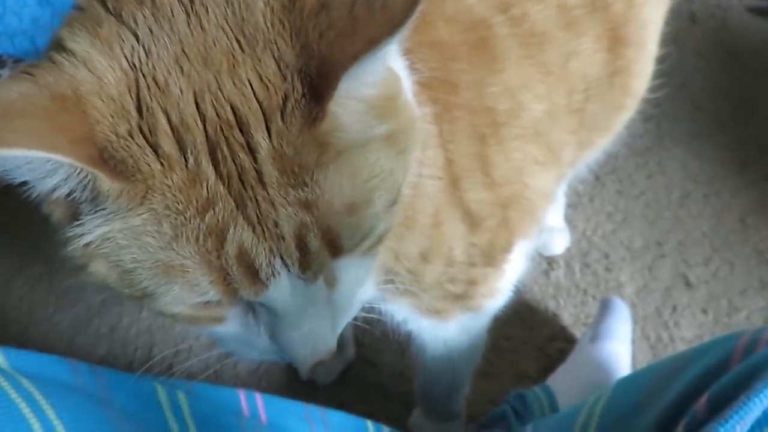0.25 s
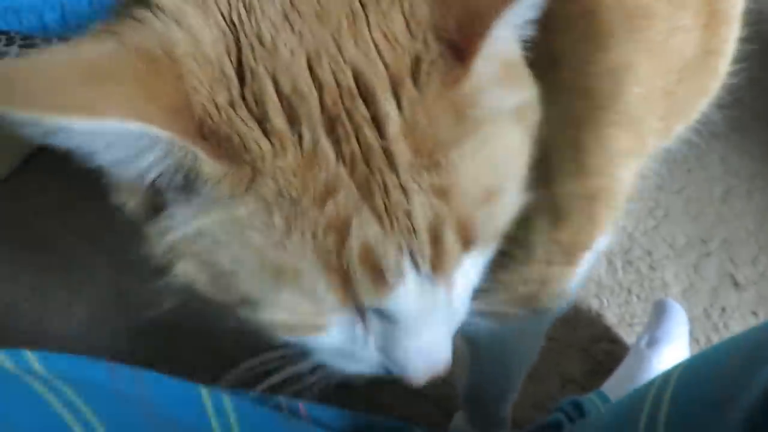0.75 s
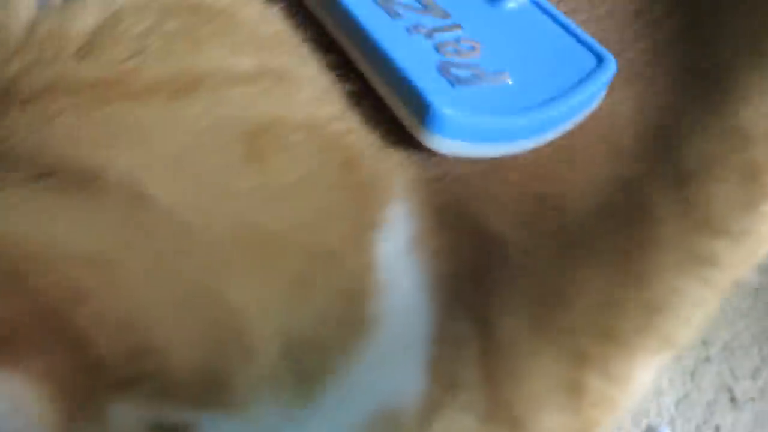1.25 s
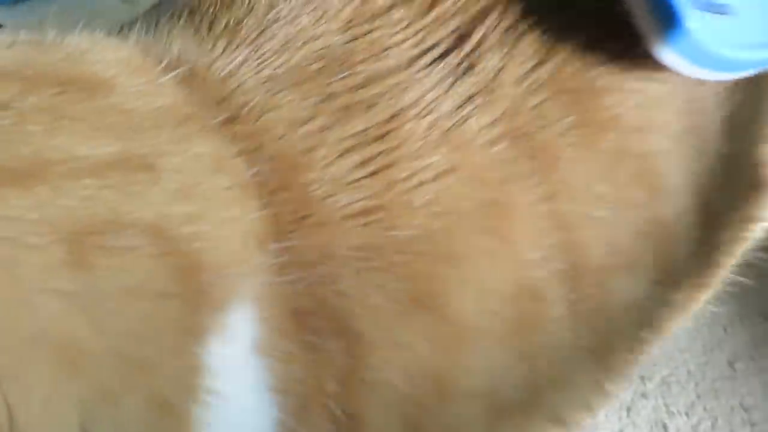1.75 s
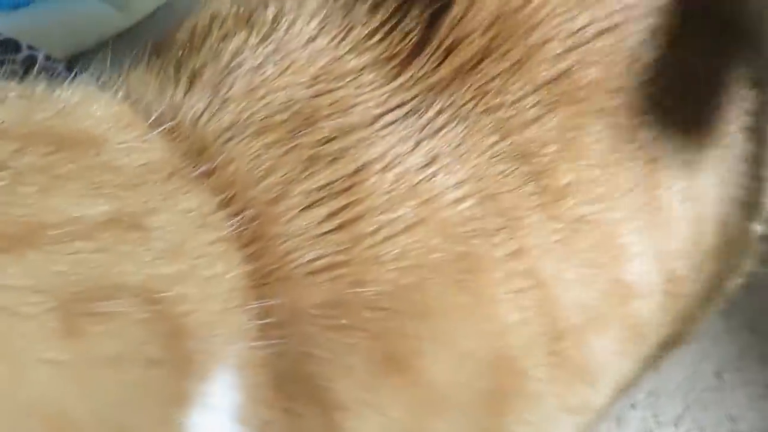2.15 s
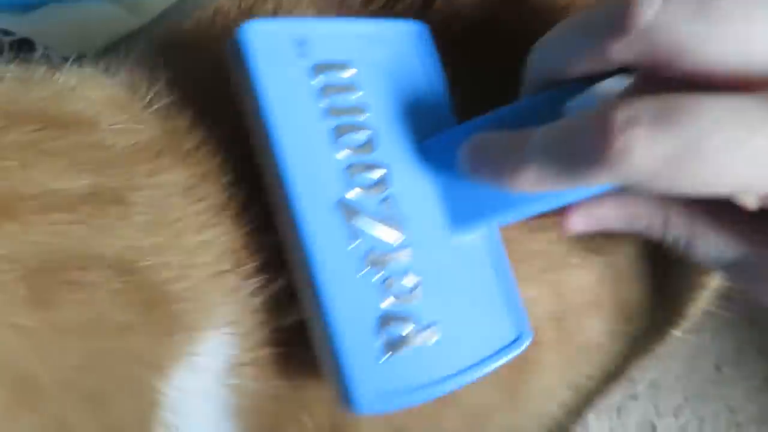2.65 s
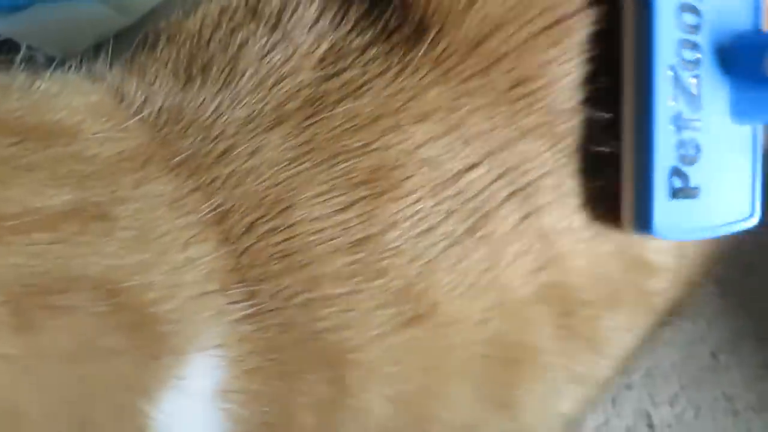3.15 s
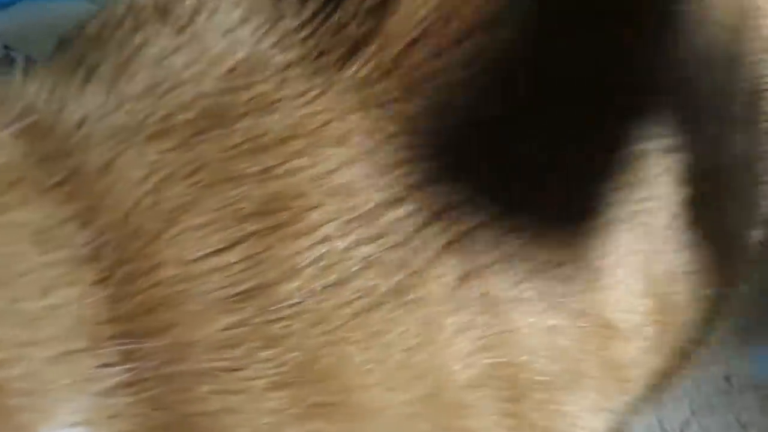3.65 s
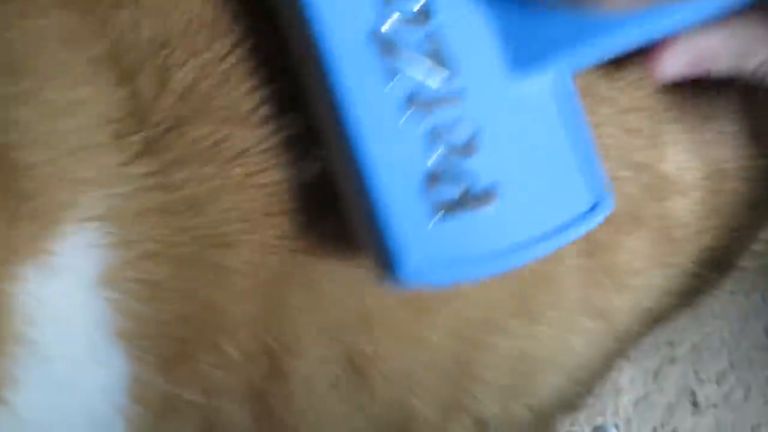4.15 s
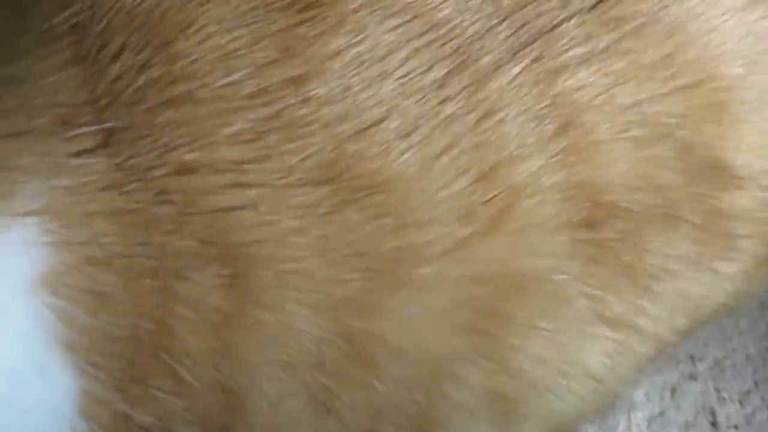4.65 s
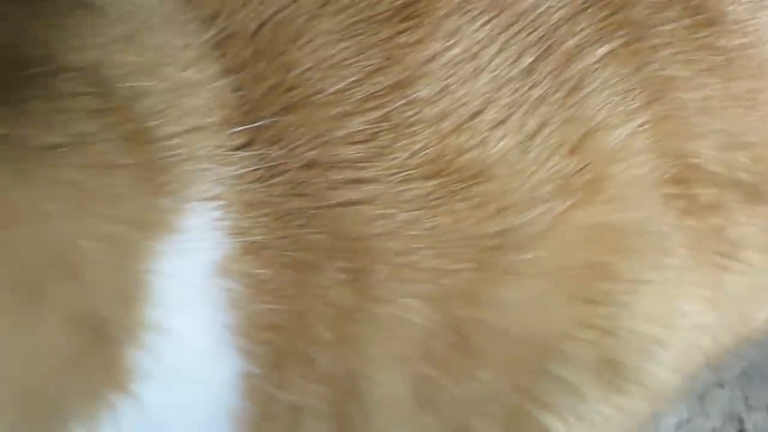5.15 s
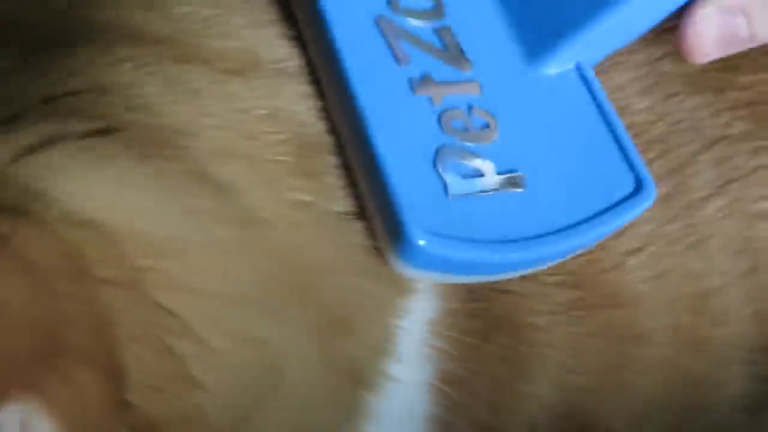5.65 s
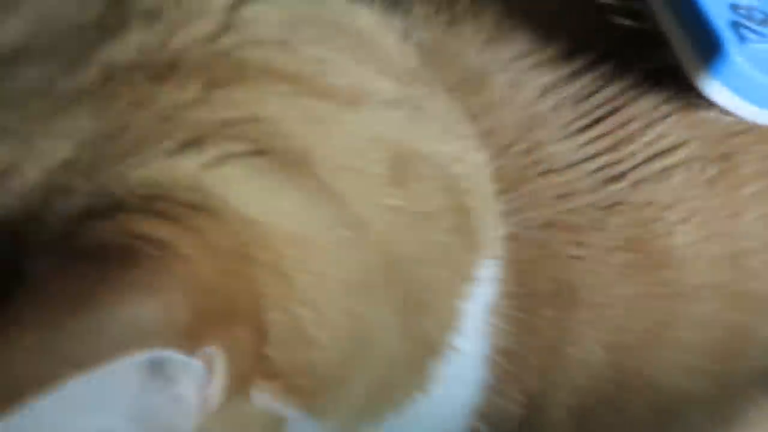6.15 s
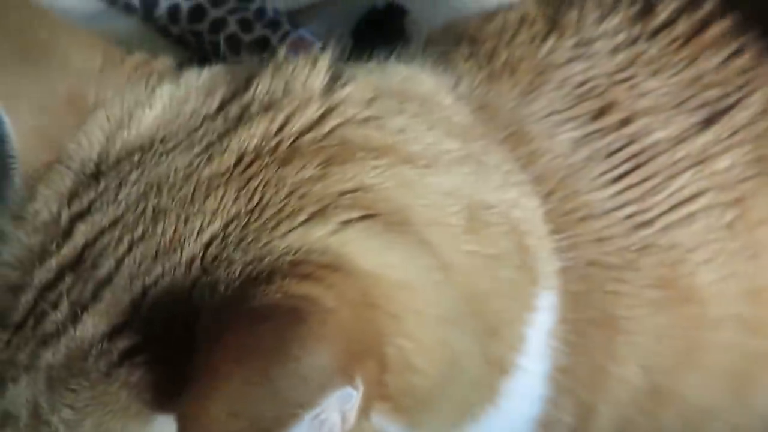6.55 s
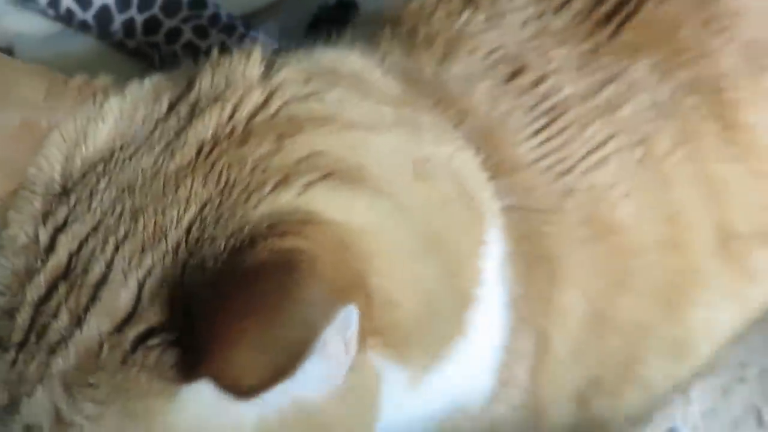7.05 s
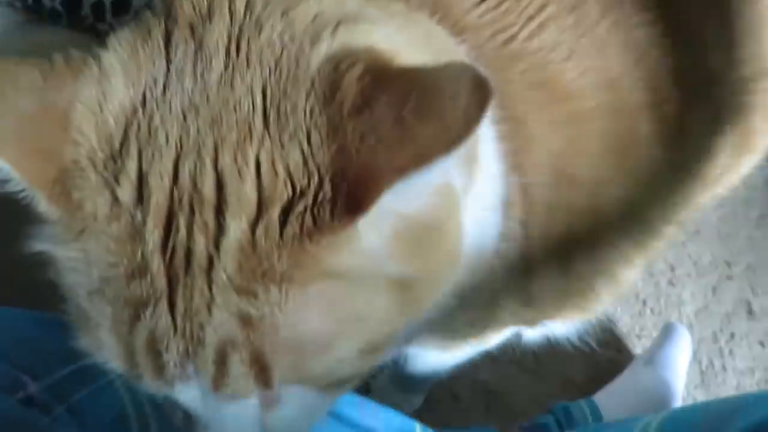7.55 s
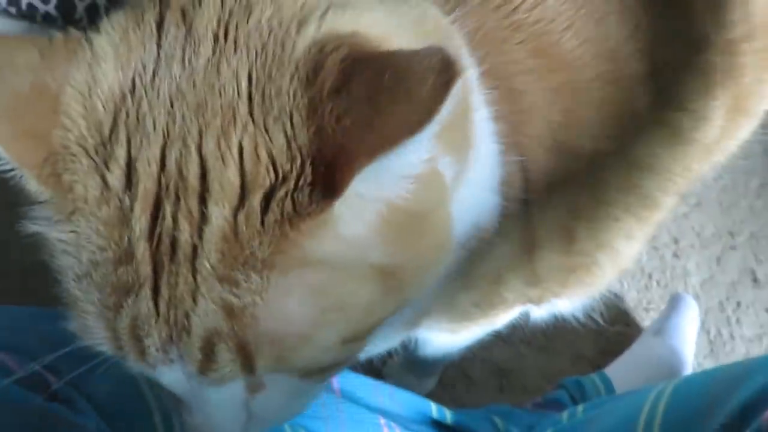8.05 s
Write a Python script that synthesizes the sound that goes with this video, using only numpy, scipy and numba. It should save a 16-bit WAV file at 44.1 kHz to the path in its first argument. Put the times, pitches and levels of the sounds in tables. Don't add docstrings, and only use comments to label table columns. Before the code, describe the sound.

A low, wavering fan hum, soft air and faint stereo hiss run throughout a quiet room. During the first second there is a faint floor shift, light fur rustle and plastic handle snaps at about 0.5 and 0.8 s, the second loudest, then a small knock near 1.2. A swelling, grainy rasp of bristles through fur runs 1.2-2.1 s. A snap at 2.3 and a deep soft thump at 2.65 lead into a firm stroke until 3.4. Clicks and a hollow knock come around 3.8-4.0. The strongest scrape starts at 4.1, peaks near 4.5 and fades by 5.2. After rustles and ticks, a lighter stroke runs 5.9-6.6, followed immediately by a short one until 7.2. Small ticks and rustling fill the gap before a gentle final stroke from 7.9, cut off at 8.3. Very close, dry, with the brush moving slightly away during strokes.

```python
import sys
import numpy as np
from scipy import signal
from scipy.fft import rfft, irfft, next_fast_len
from scipy.io import wavfile
from scipy.ndimage import uniform_filter1d
from numba import njit

SR = 44100
rng = np.random.default_rng(int(sys.argv[2]) if len(sys.argv) > 2 else 0)


def rack_gain(trim_db):
    fader = np.asarray(trim_db, float)
    return 10 ** (fader / 20)


def file_out(sig):
    cols = np.atleast_2d(sig).T
    lim = np.clip(cols, -1, 1)
    pcm = np.round(lim * 32767).astype(np.int16)
    wavfile.write(sys.argv[1], SR, pcm)


N = 365356
TIME = np.arange(N) / SR
FAST = next_fast_len(N)

# time_s, level_db
STROKES = [
    [(1.23, -53.5), (1.472, -38), (1.484, -42), (1.61, -34.5), (1.82, -34.5), (1.844, -31.5), (1.918, -36),
     (2.028, -36.5), (2.12, -55.5)],
    [(2.66, -43), (2.668, -53.5), (2.77, -38), (2.916, -39.5), (3.094, -33), (3.232, -36.5), (3.404, -40),
     (3.438, -57), (3.45, -49)],
    [(4.09, -61), (4.098, -49.5), (4.234, -34.5), (4.314, -39.5), (4.484, -29), (4.646, -32), (4.89, -38),
     (5.19, -51.5), (5.2, -62)],
    [(5.86, -50.5), (6.016, -39.5), (6.028, -45), (6.05, -39), (6.056, -39.5), (6.164, -43.5), (6.272, -42),
     (6.46, -34.5), (6.6, -44.5)],
    [(6.66, -46.5), (6.74, -38.5), (6.828, -39), (6.86, -36.5), (7.11, -44.5), (7.182, -52), (7.2, -59)],
    [(7.93, -50), (7.948, -52), (7.99, -53), (8.014, -47), (8.206, -40.5), (8.28, -41)],
]
# time_s, tilt_db (shell share), facing_db (tips toward camera)
TILTS = [
    [(1.3, -5.5, 1.5), (1.4, -8, 1), (1.63, -9.5, 0), (1.86, -4, 0.5), (2.04, -9.5, 2.5), (2.08, -5.5, 4)],
    [(2.72, -7.5, -6), (2.77, -10, 2), (2.9, -7.5, -4), (3.1, -7, -2.5), (3.22, -5.5, 1), (3.34, -7.5, 1.5),
     (3.42, -7, -2)],
    [(4.12, -9.5, -2), (4.21, -8, 6.5), (4.27, -8.5, 0.5), (4.47, -6, -2), (4.65, -2.5, 2),
     (4.73, -3.5, -7), (4.86, -6, 2.5), (5.15, -7.5, 2)],
    [(5.9, -9.5, -3), (6.0, -7, -2), (6.17, -10.5, 1), (6.31, -8.5, 0), (6.42, -8, 1), (6.5, -7.5, -0.5),
     (6.58, -7, -1)],
    [(6.68, -8.5, 1), (6.76, -4.5, 0), (6.88, -6, 1), (6.96, -1.5, 4), (7.1, -6.5, 3.5), (7.16, -4, 4)],
    [(7.95, -6.5, 0), (8.02, -7, -0.5), (8.14, -7, 3.5), (8.2, -7.5, -2.5), (8.28, -9, 2)],
]
# start_s, arrive_s, return_s
SWEEPS = [
    (1.302, 2.123, 2),
    (2.7, 3.55, 3.8),
    (4.2, 4.85, 5.4),
    (5.894, 6.6, 7),
    (7.9, 8.8, 8.9),
]
# freq_hz, gain_db
FUR_SPECTRUM = [(700, -18), (1300, -10), (2900, 0), (3500, -1.5), (5500, -7.5), (7000, -7), (9000, -30)]
# freq_hz, gain_db
TIP_SPECTRUM = [(3500, -20), (5800, 10), (7000, 10.5), (8500, 12), (11000, 15.5), (13000, 15.5),
                (14500, 9.5), (16000, 9)]
# freq_hz, gain_db
TIP_TOP_SPECTRUM = [(11500, -30), (14500, -12)]
# freq_hz, gain_db
SIDE_GAIN = [(500, -24), (2200, -6), (5000, 0), (9000, 3), (13000, 3), (16000, 9)]
# start_s, peak_db, low_ring_hz, shell_db, treble_db
SNAPS = [
    (.4645, -26.5, 2140, -12, -8),
    (.7883, -16.5, 2500, 3.5, -3.5),
    (.9594, -31, 3470, 2, -3.5),
    (2.3340, -24.5, 2600, 3, -2.5),
    (3.8072, -28.5, 1780, -5, 11),
    (4.0070, -32.5, 1920, -10, -20),
    (5.4505, -30.5, 2620, -1, -4),
    (5.8208, -28.5, 1900, -3, 2.5),
]
# start_s, peak_db, low_ring_hz
BOUNCES = [(0.47, -32.5, 3260), (.4750, -32, 1500), (.4810, -38, 2600), (0.791, -33, 2980),
           (2.3423, -39, 2600), (2.3470, -35, 2500), (2.3506, -31.5, 2550), (2.3566, -39, 2600),
           (3.8119, -50, 1700)]
# start_s, peak_db, low_ring_hz
TICKS = [(0.4995, -40, 1610), (0.6995, -40, 1920), (0.9035, -39, 2060), (0.989, -36.5, 1630),
         (1.044, -41, 1640), (1.466, -37, 2050), (2.3793, -39, 2340), (2.4093, -44, 1640),
         (2.4502, -46, 1740), (2.6525, -49, 1950), (2.758, -28, 2200), (2.772, -26, 1940),
         (3.5674, -45, 2410), (4.019, -47, 1910), (5.2744, -36, 2270), (5.474, -42, 2200),
         (5.565, -37, 1530), (5.672, -39, 1620), (5.702, -41, 1870), (7.2798, -43, 2070),
         (7.414, -38, 2090), (7.614, -38.5, 1840), (7.706, -36.5, 3000), (7.773, -35, 1690),
         (7.812, -40, 1960), (7.9035, -32, 1720)]
# time_s, level_db
RUSTLES = [
    [(0.4, -65), (0.932, -51), (1.25, -64)],
    [(2.1, -55), (2.356, -61), (2.62, -56.5)],
    [(3.45, -51), (3.752, -72), (4.016, -52.5), (4.1, -63)],
    [(5.2, -66), (5.368, -61), (5.636, -61), (5.85, -48)],
    [(7.2, -52), (7.342, -59), (7.678, -57), (7.9, -48.5)],
]
# start_s, peak_db, pitch_hz, t60_s
KNOCKS = [
    (1.164, -27.5, 315, 0.0072),
    (1.1650, -38, 735, 0.012),
    (3.95, -30, 343, 0.068),
]
# start_s, peak_db, settled_hz, hold_s, t60_s
THUMPS = [
    (2.116, -33, 35.6, 0.11, .5),
    (2.139, -37, 65, 0.13, 0.41),
    (2.653, -22, 50.4, 0.018, 0.16),
    (2.672, -27, 36, 0.13, 0.52),
    (3.162, -33, 39, 0.054, 0.46),
    (5.131, -34.5, 76.6, 0.069, 0.53),
    (0.038, -38, 86, 0.092, 0.41),
    (.72, -43.5, 69, 0.55, .6),
]
# centre_s, peak_db, length_s
HUM_SWELLS = [(.3, -42.5, 0.37), (.56, -38.5, 0.088), (1.012, -43.5, 0.57), (1.506, -42.5, 0.4),
              (1.91, -43, 0.41), (2.345, -45.5, 0.33), (2.953, -45, 0.52), (3.473, -43.5, 0.22),
              (3.75, -43.5, 0.1), (4.258, -43.5, 0.55), (4.86, -43, 0.35), (5.356, -45, 0.31),
              (5.666, -43.5, 0.44), (6.03, -42, 0.23), (6.337, -41.5, 0.19), (6.707, -43, 0.19),
              (6.95, -45.5, 0.2), (7.165, -40.5, 0.2), (7.493, -44, 0.24), (7.903, -47.5, 0.63)]
# time_s, level_db
DRONE_LEVEL = [(0, -44), (.6, -64.5), (.8, -45.5), (1.6, -45), (2.0, -54), (3.3, -49), (3.55, -47),
               (5.2, -46), (5.8, -45.5), (6.6, -46.5), (6.8, -55), (8.28, -61)]
# freq_hz, level_db, width_hz
MOTOR_BANDS = [(241.4, -52, 33), (349.9, -56.5, 26)]
# freq_hz, density_db_per_hz
ROOM_SPECTRUM = [(12, -52), (25, -13), (90, -4.5), (120, -5), (150, -8.5), (219, -12.5), (390, -14.5),
                 (500, -22.5), (881, -23.5), (1600, -29), (8400, -45.5), (11000, -51), (13500, -54.5),
                 (15500, -84)]
# freq_hz, density_db_per_hz
HISS_SPECTRUM = [(12, -62), (20, -35), (107, -13.5), (145, -6.5), (226, -3), (442, -2.5), (635, -7),
                 (1390, -10.5), (2290, -12), (6250, -21.5), (11200, -31), (15700, -34)]
LINES_HZ = (480, 603, 865.5)
LINES_DB = (-65, -68, -64)

SHELL_HZ = 4344
FLAT_TILT_DB = -6.5


def level(x, rms_db):
    return x * rack_gain(rms_db) / np.sqrt(np.mean(x ** 2))


def colour(x, points):
    points_hz, points_db = np.transpose(points)
    bin_hz = np.arange(FAST // 2 + 1) * SR / FAST + 1
    gain = rack_gain(np.interp(np.log(bin_hz), np.log(points_hz), points_db))
    return irfft(rfft(x, FAST) * gain, FAST)[:N]


@njit
def svf(x, hz, width_hz):
    y, band, low = np.empty(len(x)), 0., 0.
    for i in range(len(x)):
        g, k = np.tan(np.pi * hz[i] / SR), width_hz / hz[i]
        v = (band + g * (x[i] - low)) / (1 + g * (g + k))
        band, low, y[i] = 2 * v - band, low + 2 * g * v, k * v
    return y


def ring(x, hz, width_hz):
    hz = np.clip(hz + np.zeros(len(x)), 20, SR / 3)
    once = svf(x, hz, 1. * width_hz)
    return svf(once, hz, 1. * width_hz)


def walk(rate_hz):
    hold = int(SR / rate_hz)
    steps = np.repeat(rng.standard_normal(N // hold + 1), hold)
    return uniform_filter1d(uniform_filter1d(steps, hold), hold)[:N]


def play(tables, fade_s):
    rows = []
    for table in tables:
        first, last = table[0], table[-1]
        if rows and first[0] - rows[-1][0] < fade_s:
            rows.pop()
        else:
            rows.append([first[0] - fade_s, -95, *first[2:]])
        rows += [*table, [last[0] + fade_s, -95, *last[2:]]]
    time_s, *columns = np.transpose(rows)
    return [np.interp(TIME, time_s, column) for column in columns]


def brush(tangles_db):
    pressure_db, = play(STROKES, fade_s=0.078)
    time_s, tilt_db, facing_db = np.concatenate(TILTS).T
    tilt_db = np.interp(TIME, time_s, tilt_db) - FLAT_TILT_DB
    facing = rack_gain(np.interp(TIME, time_s, facing_db))
    pad_hz = (1802 + 6 * tilt_db) * (1 + 0.05 * walk(14))
    rim_hz = 2460 * (1 + 0.05 * tilt_db + 0.04 * walk(12))
    shell_hz = SHELL_HZ * (1 + 0.04 * walk(9))
    # flat_db, slope (dB per dB of tilt), far_db (change once moved off), sound
    layers = [(-3.5, -0.64, -2.3, ring(slips(), pad_hz, 750)),
              (-11, 0.19, 3.6, ring(slips(), rim_hz, 820)),
              (-12, -0.4, 2.2, ring(slips(), 1158, 720)),
              (-6, 1.75, -0.32, ring(slips(), shell_hz, 1520)),
              (-10.5, -0.15, 2.8, colour(slips(), FUR_SPECTRUM)),
              (-11, 0.02, 0.3, tips(facing))]
    total = np.zeros(N)
    for flat_db, slope, far_db, sound in layers:
        motion_db = uniform_filter1d(pressure_db + slope * tilt_db + far_db * travel(), size=1500)
        total += level(sound, flat_db) * rack_gain(motion_db + tangles_db + 1.3 * walk(40))
    return echo(total)


def slips(rate_hz=5000, spread_db=3):
    chance = rng.random((3, N))
    size = rack_gain(np.minimum(-spread_db * np.log(chance[0] + 1e-9), 13))
    return (chance[1] < rate_hz / SR) * size * np.sign(chance[2] - .5)


def tips(facing):
    hiss = colour(slips(), TIP_SPECTRUM)
    top_db = -9 * travel()
    return facing * (hiss + (rack_gain(top_db) - 1) * colour(hiss, TIP_TOP_SPECTRUM))


def travel():
    along = np.linspace(0, 1, num=6)
    time_s, distance = [.75], [1]
    for start_s, arrive_s, return_s in SWEEPS:
        time_s += [*(start_s + along * (arrive_s - start_s)), return_s]
        distance += [*along ** 2, 1]
    return np.interp(TIME, time_s, distance)


def echo(x):
    delay = np.round(2.8 * (1 + .25 * walk(3)) * SR / 1000).astype(int)
    late = np.arange(N) - delay
    return x + 0.45 * x[np.clip(late, 0, N - 1)]


def ticks():
    out, t = np.zeros(N), np.arange(2048) / SR
    rows = [*SNAPS]
    rows += [(*bounce, -3, -9) for bounce in BOUNCES]
    rows += [(s, db - 1.5, hz, -3, -9) for s, db, hz in TICKS]
    noise = rng.standard_normal((len(rows), 4, len(t)))
    for (start_s, peak_db, low_hz, shell_db, treble_db), x in zip(rows, noise):
        rise_ms = 1.45 * rack_gain(-0.6 * max(treble_db + 7, 0))
        u = t * 1000 / rise_ms
        burst = u * np.exp(-u ** 2 / 2)
        rattle = 0.07 * np.minimum(u, 1) * np.exp(-t / 0.012)
        low, shell, edge, crack = x * (burst + rattle)
        edge_hz = 6000 + 190 * max(treble_db + 6.5, 0)
        parts = [(0, ring(low, low_hz, 950)),
                 (shell_db, ring(shell, SHELL_HZ, 1050)),
                 (treble_db, ring(edge, edge_hz, 0.71 * edge_hz)),
                 (-7, ring(crack, 2500, 4900))]
        tick = sum(rack_gain(db) * part / abs(part).max() for db, part in parts)
        i = int(start_s * SR)
        out[i:i + len(t)] += rack_gain(peak_db) * tick / abs(tick).max()
    return out


def rustle():
    whisper = svf(slips() * rack_gain(4 * walk(25)), np.full(N, 2600.), 3000.)
    crackles = sum(ring(slips(rate_hz=70, spread_db=3.5), hz, 1200) for hz in (1900, 2900, SHELL_HZ))
    rustle_db, = play(RUSTLES, fade_s=0.09)
    return level(whisper + 9 * crackles, 0) * rack_gain(rustle_db - 5)


def thumps():
    out = np.zeros(N)
    knocks = [(s, db, hz, .003, t60_s) for s, db, hz, t60_s in KNOCKS]
    for start_s, peak_db, last_hz, hold_s, t60_s in [*THUMPS, *knocks]:
        first_hz = last_hz + 0.4 + 0.9 * (peak_db + 43)
        t = np.maximum(TIME - start_s, 0)
        turns = last_hz * t + (first_hz - last_hz) * 0.015 * (1 - np.exp(-t / 0.039))
        decay = rack_gain(-60 * np.maximum(t - hold_s, 0) / t60_s)
        swell = np.minimum(t * first_hz * 4, 1) * decay
        out += rack_gain(peak_db) * swell * np.sin(2 * np.pi * turns)
    return out


def ventilation():
    out = np.zeros(N)
    hum = sum(rack_gain(db) * np.exp(-(2 * (TIME - s) / length_s) ** 4) for s, db, length_s in HUM_SWELLS)
    drone = rack_gain(np.interp(TIME, *np.transpose(DRONE_LEVEL)))
    for hz, swell in (121.1, hum), (51, drone):
        turns = np.cumsum(hz + 2.57 * walk(6)) / SR
        out += np.sqrt(2) * swell * rack_gain(0.5 * walk(9)) * np.sin(2 * np.pi * turns)
    for hz, db in zip(LINES_HZ, LINES_DB):
        turns = np.cumsum(hz + .8 * walk(5)) / SR
        out += np.sqrt(2) * rack_gain(db + 3.5 * walk(8.4)) * np.sin(2 * np.pi * turns)
    for hz, db, width_hz in MOTOR_BANDS:
        out += level(ring(rng.standard_normal(N), hz, width_hz), db)
    return out


def room_air():
    return level(colour(rng.standard_normal(N), ROOM_SPECTRUM), -42)


def camera_hiss():
    return level(colour(rng.standard_normal(N), HISS_SPECTRUM), -47.5)


def ports(x, lag_samples):
    spectrum, turn = rfft(x, FAST), np.pi * np.arange(FAST // 2 + 1) / FAST
    out = 0
    for step in np.arange(0, 2.75, .5):
        share = np.maximum(1 - 2 * abs(np.clip(lag_samples, 0, 2.5) - step), 0)
        mid_side = spectrum * [np.cos(turn * step), -1j * np.sin(turn * step)]
        out = out + share * irfft(mid_side, FAST)[:, :N]
    return out


def scene():
    lag_samples = 0.47 + (1.23 - 0.47) * travel()
    end_lag_samples = 0.15
    tangles_db = walk(50) - 3
    near = ports(brush(tangles_db) + rustle(), lag_samples - end_lag_samples)
    near = near + ports(brush(tangles_db), lag_samples + end_lag_samples)
    near = near + ports(ticks(), lag_samples)
    mid = near[0] + thumps() + ventilation() + room_air()
    side = colour(near[1], SIDE_GAIN) - 0.044 * near[0] + camera_hiss()
    return np.array([mid + side, mid - side])


def low_pass(x):
    return signal.sosfilt(signal.butter(12, 15850, fs=SR, output="sos"), x)


def record(dry):
    return low_pass(dry)


dry = scene()
out = record(dry)
file_out(out)
```